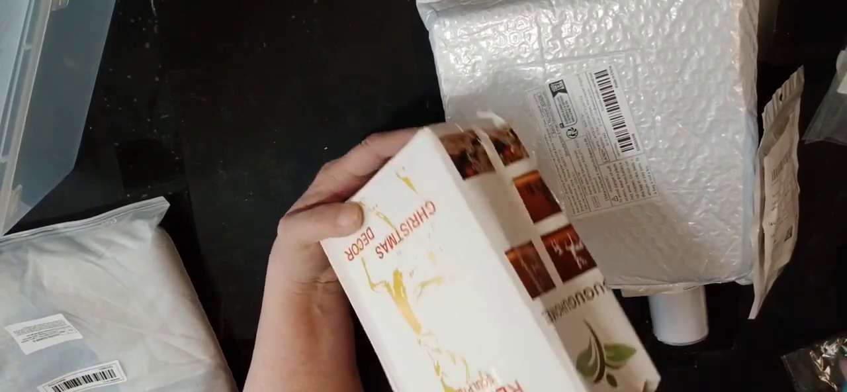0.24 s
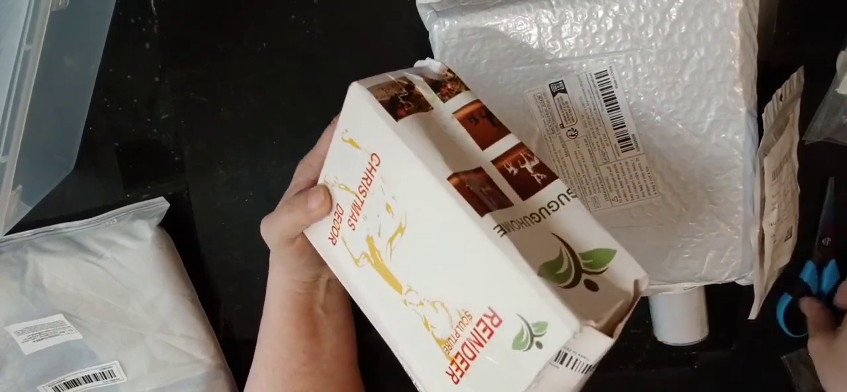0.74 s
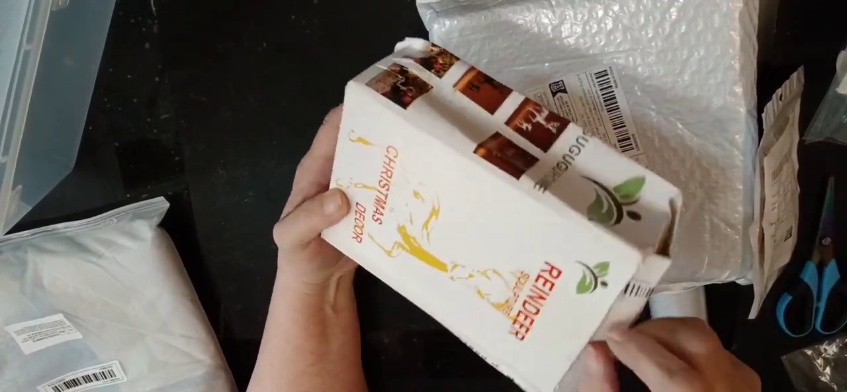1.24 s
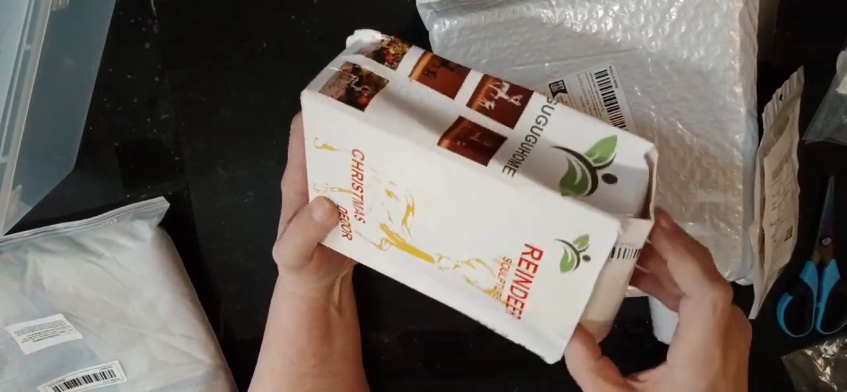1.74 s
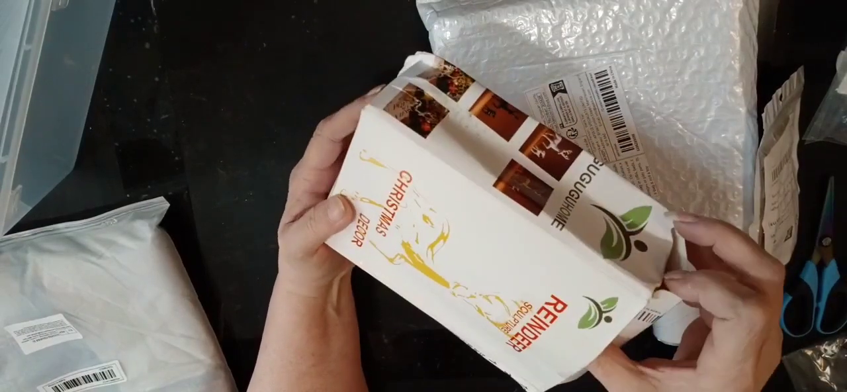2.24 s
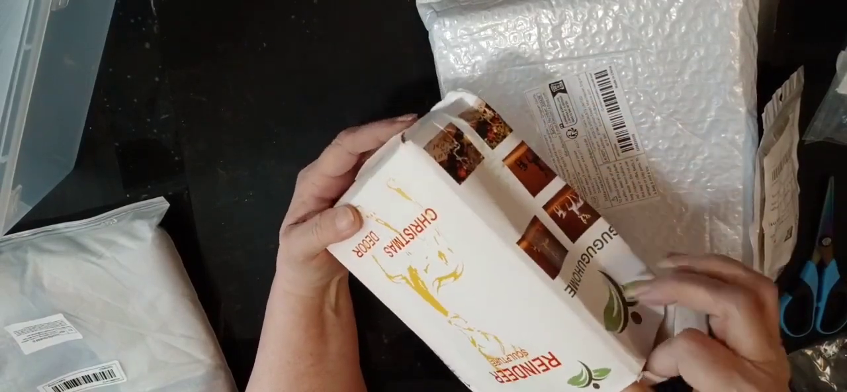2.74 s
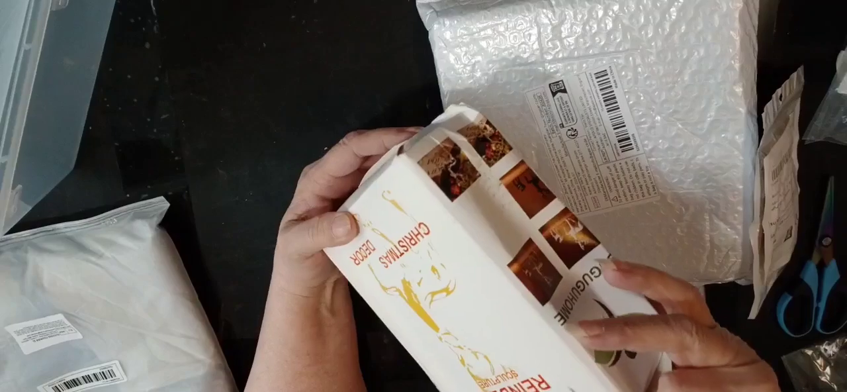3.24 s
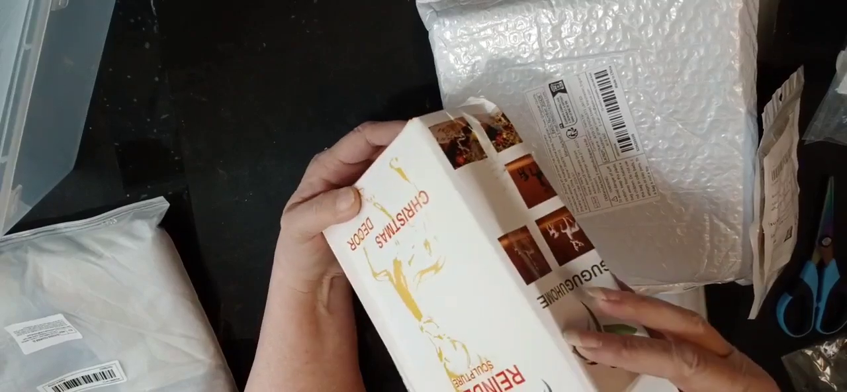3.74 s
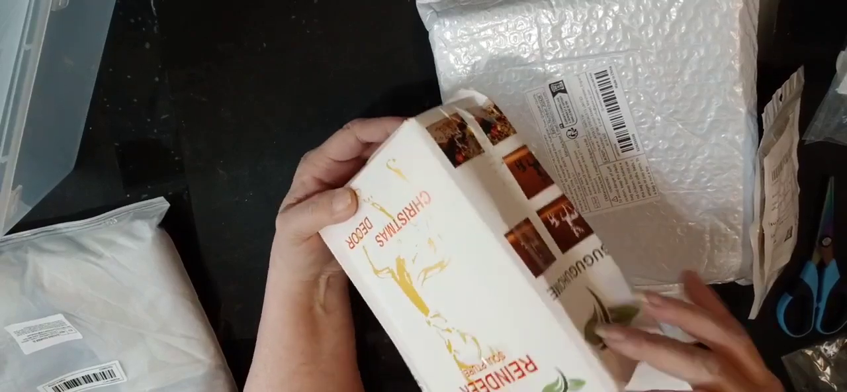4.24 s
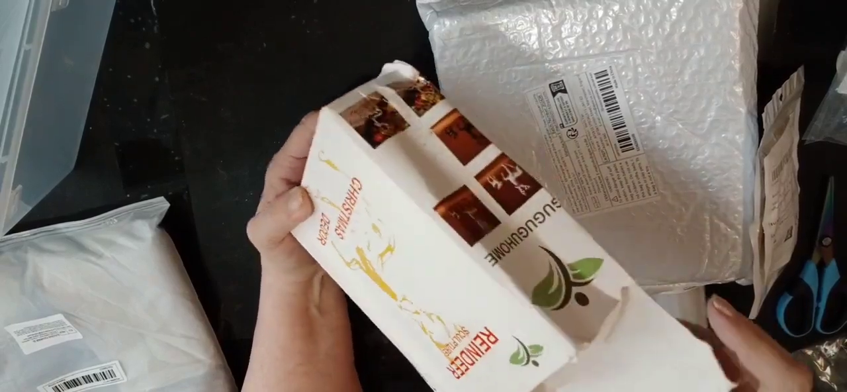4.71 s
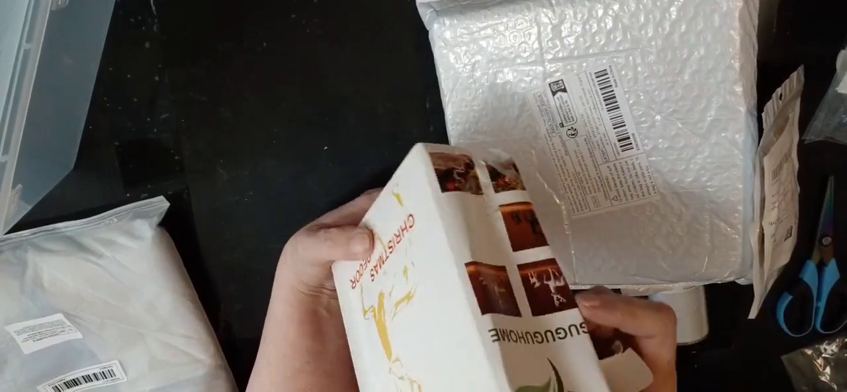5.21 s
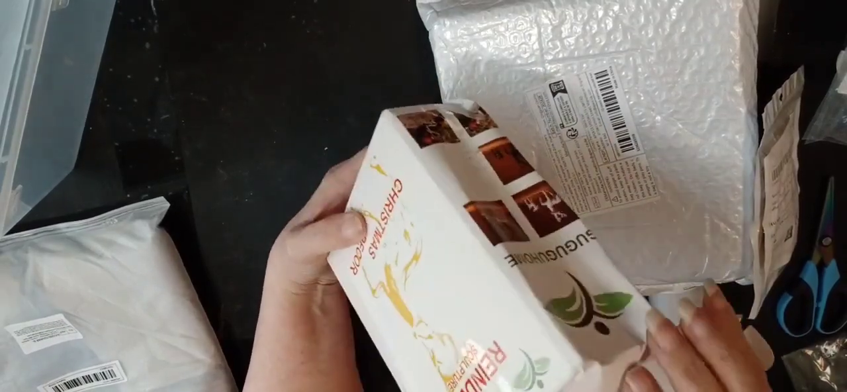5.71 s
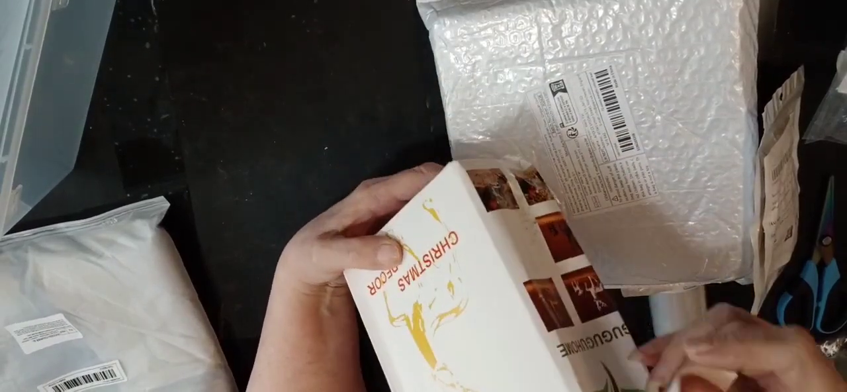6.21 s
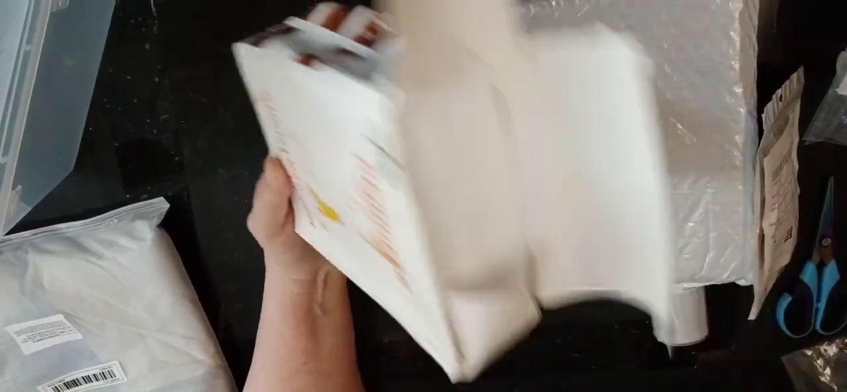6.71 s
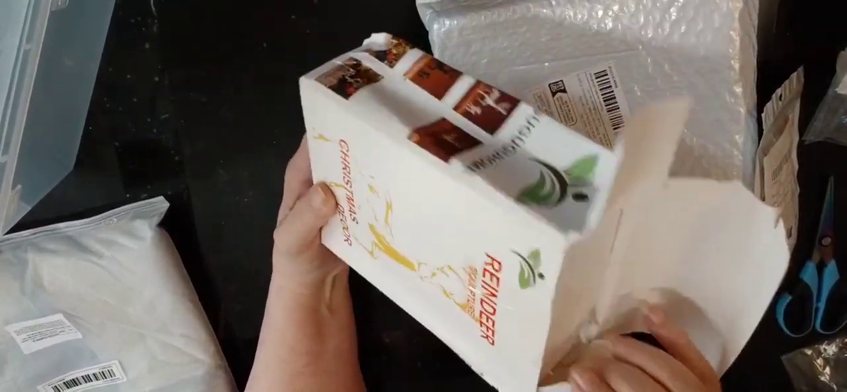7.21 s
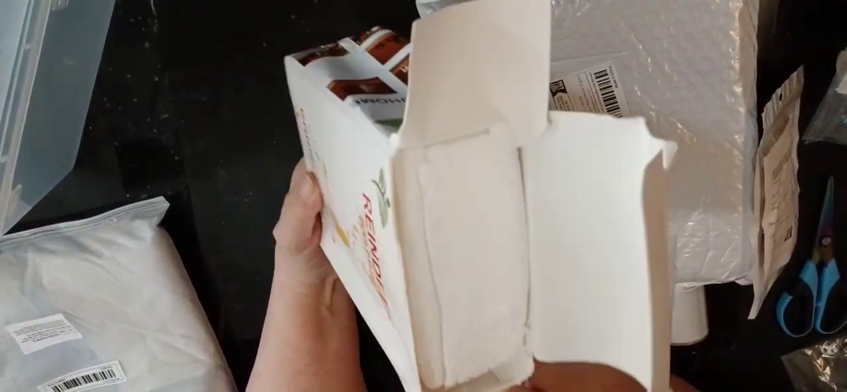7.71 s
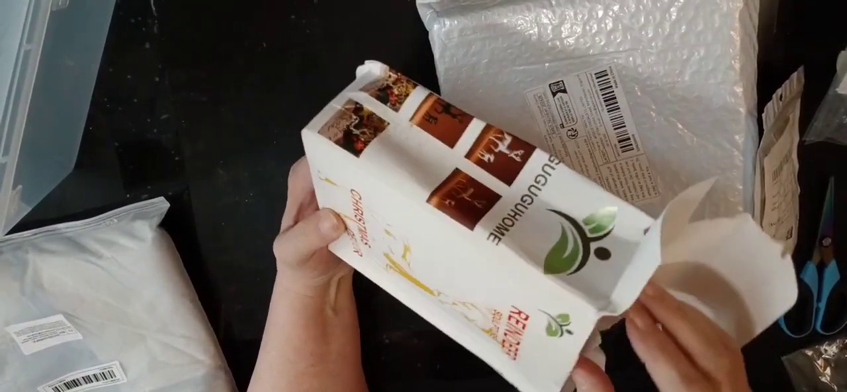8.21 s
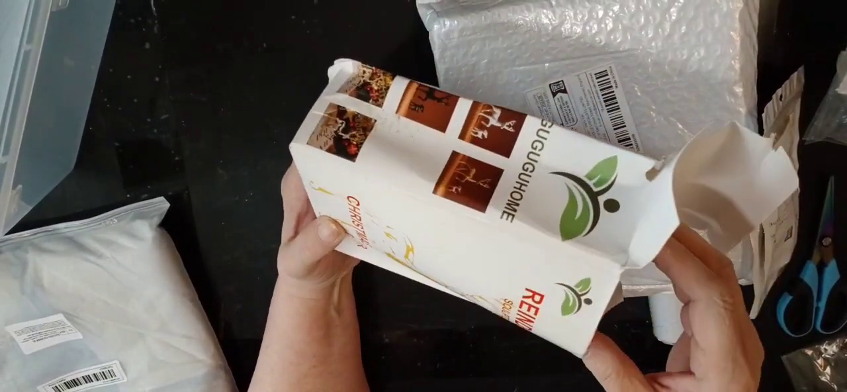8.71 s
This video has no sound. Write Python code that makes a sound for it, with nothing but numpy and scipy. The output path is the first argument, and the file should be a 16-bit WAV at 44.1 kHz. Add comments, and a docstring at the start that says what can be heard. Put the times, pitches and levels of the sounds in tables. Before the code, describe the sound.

A thin cardboard box is handled close up in a small, dry room with very faint low ventilation rumble. It starts almost silent; at 0.45-0.65 s the box bumps the table with soft low thuds and a thin bright tick. Sparse faint rubbing and small taps follow, with a crisp pop near 2.05. From 2.8 scraping grows, with hollow crackling thumps at 3.1-3.2 and the loudest sharp snap at 3.36, edged with a short rasping squeak. Lighter creaks and clicks come at 4.2, then a boxy buckling pop at 4.83. Busy sliding continues, with pops and a creak at 5.5-5.7. From 5.9 to 6.45 the flap drags out with a gritty rasp, ticks and snaps. A brief lull follows; soft brushing resumes at 7.1, a strong crack lands at 7.44, a click at 8.1, then light rubbing fades.

```python
"""Cardboard box worked open

A thin box is turned in the hands over a table in a small room: it bumps the table, then its end flap is freed.
Rubbing is random tiny slips over a smooth hiss; snaps are a crack plus crumbling noise; both ring through the box.
Gliding narrow-band noise rasps, swelling mode pairs creak, high-passed noise ticks, damped modes thud and thump.
The dragging flap tears free and snaps; short room reflections and a low ventilation rumble lie behind."""
import sys
import numpy as np
from scipy import signal
from scipy.fft import rfft, irfft
from scipy.io import wavfile
from scipy.ndimage import uniform_filter1d

SR = 44100
rng = np.random.default_rng(int(sys.argv[2]) if len(sys.argv) > 2 else 0)


def int16_out(signal):
    """Quantize to a 16-bit WAV file."""
    q = np.round(np.clip(np.atleast_2d(signal).T, -1, 1) * 32767)
    wavfile.write(sys.argv[1], SR, q.astype(np.int16))


N = 394694
TIME = np.arange(N) / SR
RING_SIZE = 2 ** 14
AGE = np.arange(RING_SIZE) / SR
HZ = np.maximum(np.fft.rfftfreq(RING_SIZE, 1 / SR), 1)

# body, flap and fibres, one row each: [left-right likeness/0-1, scattered re direct sound/dB]
SOUND_ZONES = [(.93, -8), (.87, -4), (.65, 0)]


def from_db(db):
    """Decibels to gain."""
    return 10 ** (np.asarray(db) / 20)


def unit(x):
    """Scale to a mean energy of one per channel."""
    channels = x.size / x.shape[-1]
    return x / np.sqrt(np.sum(x ** 2) / channels + 1e-20)


def blow(sound, db):
    """Give a short sound its level: its energy spread over 20 ms, as rms."""
    return from_db(db) * unit(sound) * np.sqrt(.02 * SR)


def add(out, start, sound):
    """Mix a sound in from a sample on."""
    out[:, start:start + sound.shape[-1]] += sound[:, :N - start]


def in_time(rows):
    """Columns of a curve at every sample."""
    s, *columns = np.transpose(rows)
    return [np.interp(TIME, s, column) for column in columns]


def drift(knots_per_s):
    """Smooth chance with a spread of about one."""
    knots = rng.standard_normal(N // 20)
    return np.interp(TIME * knots_per_s, np.arange(len(knots)), knots)


def spectrum_db(points):
    """Join spectrum points on a log-frequency axis."""
    hz, db = np.transpose(points)
    return np.interp(np.log(HZ), np.log(hz), db)


def causal(gain):
    """Minimum-phase impulse response with the given gain per frequency, by folding the cepstrum."""
    cepstrum = irfft(np.log(gain + 1e-7))
    cepstrum[1:RING_SIZE // 2] *= 2
    cepstrum[RING_SIZE // 2 + 1:] = 0
    return irfft(np.exp(rfft(cepstrum)))


def through(x, response):
    """Pass a sound through an impulse response."""
    return signal.fftconvolve(np.atleast_2d(x), np.atleast_2d(response), axes=-1)[:, :x.shape[-1]]


def pair(x, likeness):
    """Mix three unrelated signals into two partly alike channels."""
    share = np.clip(likeness, 0, 1)
    return np.sqrt(share) * x[0] + np.sqrt(1 - share) * x[1:]


def rubbing(responses, slips_per_s=3400, size_db=2.5, judder_db=1.91, smooth=.55):
    """Fibres catch and let go at random; harder strokes free more of them, over a smooth sliding hiss."""
    power = hand_power()
    total = power.sum(axis=0)
    level_db = 10 * np.log10(total)
    shares = np.sqrt(power / total)

    # slips_per_s holds at a level of -41.5 dB
    chance = slips_per_s / SR * from_db(0.27 * (level_db + 41.5))
    happens = rng.random(N) < chance
    sizes = happens * from_db(size_db * np.minimum(rng.exponential(1, N), 4))
    local_power = uniform_filter1d(sizes ** 2, size=1500).clip(0)
    slips = sizes / np.sqrt(local_power + .001)

    stroke = from_db(level_db + judder_db * drift(130)) / np.hypot(1, smooth)
    force = np.hypot(slips, smooth) * stroke * rng.standard_normal((3, N))
    out = np.zeros((2, N))
    for share, (likeness, scatter_db), response in zip(shares, SOUND_ZONES, responses):
        out += through(turning(share * pair(force, likeness), scatter_db), response)
    return out


def hand_power(lean=0.93, point=1):
    """Rubbing power in body, flap and fibres: holding hands, dragging flap and one arch per stroke."""
    # levels here are ahead of the rubbing gain in scene()
    # fingers and card edges sliding: [start t/s, length/s, flap/dB, body re flap/dB, fibre hiss re flap/dB]
    strokes = [(0.119, 0.16, -72.5, 0.5, -3), (0.519, 0.16, -56.5, -13, 0.5), (1.374, 0.13, -56, -2.5, 2),
               (1.608, 0.05, -55, -2, -3), (1.765, 0.2, -54.5, -3, 0.5), (1.951, 0.075, -47.5, -3, 0),
               (1.99, 0.23, -53, 2, -3), (2.303, 0.22, -53.5, -3.5, 0), (2.828, 0.055, -49.5, 0, -8),
               (2.87, 0.17, -48, -5.5, -5.5), (3.031, .21, -44, -11.5, -1), (3.3, 0.094, -36.5, -3, -3),
               (3.537, 0.044, -50.5, -12, -3), (3.868, 0.038, -50, -7, -8), (4.056, 0.13, -56, -7, -2),
               (4.193, 0.075, -47, -9, -4), (4.268, 0.03, -47.5, -1.5, -3), (4.442, 0.15, -52.5, -5.5, 0.5),
               (4.697, 0.069, -48, -0.5, -1), (4.713, 0.3, -52.5, -7.5, -1.5),
               (5.06, 0.18, -47.5, -5.5, -4), (5.12, 0.076, -46, 3, -6), (5.222, 0.17, -48.5, -12, -4),
               (5.298, 0.089, -43, -6, -4), (5.643, 0.095, -49.5, -5, -5), (5.741, 0.08, -45.5, -10, 0.5),
               (6.166, 0.082, -39, -10, 3), (6.272, 0.055, -40.5, -10.5, -12), (6.47, 0.073, -51, -6, -1),
               (6.556, 0.031, -49.5, -24.5, -6), (7.018, 0.1, -57, -7, -2), (7.099, 0.092, -50.5, -5.5, -1),
               (7.392, 0.1, -43, -10, 0.5), (7.464, 0.12, -42.5, -10, -4), (7.578, 0.064, -43, -5.5, -7),
               (7.708, 0.07, -53.5, -3.5, 2), (7.77, 0.043, -49.5, -7.5, 2), (7.838, 0.11, -49.5, -5.5, -2),
               (8.209, 0.11, -48, -3, -1.5), (8.341, 0.063, -47.5, -5, 1.5),
               (8.483, 0.1, -51.5, -8.5, -2.5), (8.6, 0.19, -60, -6.5, 3)]
    # light friction of the hands that hold the box: [t/s, flap/dB]
    hold = [(0, -80), (.95, -79), (1.4, -60.5), (1.8, -64.5), (2.2, -61.5), (2.7, -61.5), (3.0, -56),
            (3.27, -67.5), (4.42, -65.5), (4.95, -63), (5.52, -66.5), (5.8, -54), (6.65, -71),
            (6.98, -82.5), (7.15, -60), (8.06, -66), (8.17, -54.5), (8.94, -64.5)]
    # tucked flap dragging out of its slot: [t/s, flap/dB, body re flap/dB, fibre hiss re flap/dB]
    drag = [(5.86, -60.5, -12, -11), (5.895, -42, -22, 1.5), (6.01, -43, -5.5, 1), (6.15, -48.5, -6, 1),
            (6.27, -47, -5.5, -4), (6.42, -39.5, -12.5, 0), (6.47, -81, 22.5, -36)]
    hold_body_db, hold_fibre_db = -4.5, -2.5  # re flap

    def zone_power(flap_db, body_db, fibre_db):
        return from_db([flap_db + body_db, flap_db, flap_db + fibre_db]).reshape(3, -1) ** 2

    dragging = (TIME > drag[0][0]) & (TIME < drag[-1][0])
    flap_db, = in_time(hold)
    holding = zone_power(flap_db, hold_body_db, hold_fibre_db)
    power = holding + dragging * zone_power(*in_time(drag))
    for s, length_s, *levels_db in strokes:
        progress = np.linspace(0, 1, round(length_s * SR))
        arch = np.abs(np.sin(np.pi * progress ** lean)) ** point  # lean shifts the crest
        add(power, round(s * SR), zone_power(*levels_db) * arch ** 2)
    return power


def snapping(responses, crack=1.1, ragged_db=4.5):
    """Each snap is one sharp crack and a quickly dying crumble of smaller breaks."""
    # creases popping, fibres tearing, nails tapping; levels ahead of flexing:
    # [t/s, flap/dB, body re flap/dB, fibre hiss re flap/dB, crumble energy decay/ms]
    snaps = [(1.018, -67, 2.5, -0.5, 4.4), (1.123, -55, 1.5, -0.5, 8.3), (1.583, -54.5, -5.5, -2, 0.89),
             (2.0506, -41, 1, -5, 6.2), (2.265, -50.5, 1, -5, 11), (2.443, -46, 1.5, -0.5, 5.3),
             (2.81, -55, -1, -6, 0.69), (3.113, -38.5, -4, -2.5, 11), (3.147, -40.5, -5, 2, 6.8),
             (3.17, -37.5, 4.5, -4, 3.6), (3.3572, -23, -5.5, -6.5, 4.4), (4.218, -42, -7, -2.5, 4.7),
             (4.239, -44, -5.5, -16, 2.3), (4.683, -53, -7, -3.5, 2.4), (4.8313, -29, 2, -4.5, 3.4),
             (5.528, -43, -2, -3, 8.8), (5.556, -39.5, -7.5, -4.5, 4.1), (5.689, -40.5, -1.5, 0, 3.5),
             (5.912, -51.5, -1, 12.5, 1.9), (5.954, -59.5, -10.5, 21, 1.9), (6.093, -36.5, -13.5, -8, 2),
             (6.333, -34, -9.5, 1, 4.9), (6.402, -38, -15.5, -1.5, 4), (7.428, -35, -8.5, 1.5, 5.3),
             (7.442, -25.5, -7, -3.5, 8.3), (8.116, -37.5, -9, -3, 0.56), (8.216, -54, 1, -13, 1),
             (8.318, -47, 0, -2, 8)]
    out = np.zeros((2, N))
    for s, flap_db, body_db, fibre_db, crumble_ms in snaps:
        raggedness = from_db(ragged_db * rng.standard_normal(RING_SIZE))
        breaks = rng.standard_normal((3, RING_SIZE)) * raggedness
        crumble = unit(breaks * np.exp(-AGE * 1000 / (2 * crumble_ms)))
        for share_db, (likeness, scatter_db), response in zip((body_db, 0, fibre_db), SOUND_ZONES, responses):
            force = pair(crumble, likeness) + crack / crumble_ms * (AGE == 0)
            ring = through(through(force, scatter(scatter_db)), response)
            add(out, round(s * SR), blow(ring, flap_db + share_db))
    return out


def box_responses(body_top_hz=1085, flap_top_hz=5040):
    """The hollow body carries the lows, the flaps the middle, the surface fibres the top."""
    # resonances of box and flaps: [f/Hz, width/Hz, height/dB]
    resonances = [(363, 60, 4.5), (471, 210, 5.5), (769, 110, 3), (1477, 220, 6)]
    # sound of one slip on card: [f/Hz, relative density/dB per Hz]
    card_spectrum = [(40, -44.5), (110, -8), (240, -13.5), (380, -6.5), (780, 0), (1100, -2.5),
                     (2400, -0.5), (4500, -1), (8000, -6.5), (16000, -16)]
    colour_db = spectrum_db(card_spectrum)
    for hz, width_hz, height_db in resonances:
        colour_db = colour_db + height_db / (1 + (2 * (HZ - hz) / width_hz) ** 2)
    below_body, below_flap = [1 / (1 + (HZ / hz) ** 6) for hz in (body_top_hz, flap_top_hz)]
    shares = [below_body, (1 - below_body) * below_flap, 1 - below_flap]
    return [unit(causal(from_db(colour_db) * np.sqrt(share))) for share in shares]


def flexing(x, width_hz=150):
    """The card's main resonance moves and changes height as the hands bend the flap and open the box."""
    # main resonance of the flap as it is bent: [t/s, f/Hz, height/dB]
    flex = [(1.45, 1170, 10), (2.1, 620, -1), (2.45, 950, 9), (2.9, 890, 8.5), (4.2, 1320, 2),
            (5.3, 1420, 6.5), (5.85, 1460, 4), (6.15, 2300, 2.5), (7.5, 1900, -2), (8.2, 1400, 7),
            (8.7, 1080, 12)]
    hz, height_db = in_time(flex)
    turn = np.exp(2j * np.pi * np.cumsum(hz) / SR)
    pole = np.exp(-np.pi * width_hz / SR)
    # shift the resonance to 0 Hz, low-pass, shift back
    ring = 2 * np.real(turn * signal.lfilter([1 - pole], [1, -pole], x / turn))
    return x + (from_db(height_db) - 1) * ring


def squeaking(width_hz=260):
    """A rough edge drives one flap resonance, whose pitch glides as the free length changes."""
    # a card edge rasping along card: [t/s, length/s, first f/Hz, last f/Hz, level/dB]
    squeaks = [(3.319, 0.038, 1750, 1378, -25), (3.32, 0.039, 2314, 2454, -26.5),
               (6.203, 0.041, 2630, 2184, -38.5), (6.273, 0.0376, 2490, 1734, -43.5),
               (6.392, 0.026, 2370, 2100, -35.5), (7.278, 0.036, 2910, 2890, -53),
               (7.507, 0.035, 2104, 2160, -42)]
    out = np.zeros((2, N))
    narrow = signal.butter(2, width_hz, fs=SR, output="sos")
    for s, length_s, first_hz, last_hz, db in squeaks:
        progress = np.minimum(AGE / length_s, 1)
        phase = 2 * np.pi * np.cumsum(first_hz + (last_hz - first_hz) * progress) / SR
        grip = signal.sosfilt(narrow, rng.standard_normal((2, RING_SIZE)))
        rasp = np.sin(np.pi * progress) * (grip[0] * np.sin(phase) + grip[1] * np.cos(phase))
        add(out, round(s * SR), blow(through(rasp, scatter(db=0.5)), db))
    return out


def creaking(wander=0.041):
    """A flap sticks and slips on its neighbour: two modes swell and die away, unsteady in pitch."""
    # [t/s, swell time to crest/s, low mode f/Hz, level/dB, high mode f/Hz, level/dB]
    creaks = [(4.21, 0.0096, 1310, -43.5, 3140, -41.5), (5.687, 0.0032, 1470, -38, 2776, -32.5)]
    out = np.zeros((2, N))
    for s, swell_s, low_hz, low_db, high_hz, high_db in creaks:
        swell = (AGE / swell_s) ** 2 * np.exp(-2 * AGE / swell_s)
        for hz, db in ((low_hz, low_db), (high_hz, high_db)):
            unsteady_hz = hz * (1 + wander * drift(510)[:RING_SIZE])
            phase = 2 * np.pi * np.cumsum(unsteady_hz) / SR
            add(out, round(s * SR), blow(through(swell * np.sin(phase), scatter(db=-5)), db))
    return out


def ticking(edge_hz=5800):
    """Each tick is a spit of decaying treble noise with almost no body."""
    # thin, very bright ticks, perhaps of crinkling plastic, and of tearing fibres:
    # [t/s, level/dB, amplitude decay/ms]
    ticks = [(.559, -38.5, 4.4), (1.285, -44, 7.3), (1.358, -56, 3), (5.049, -41, 9.6), (5.9, -48, 3),
             (6.008, -36, 3), (6.046, -50, 3), (6.113, -42, 4), (6.137, -45, 3.5)]
    out = np.zeros((2, N))
    thin = signal.butter(2, edge_hz, "high", fs=SR, output="sos")
    for s, db, decay_ms in ticks:
        spit = pair(rng.standard_normal((3, RING_SIZE)), likeness=.5) * np.exp(-AGE * 1000 / decay_ms)
        add(out, round(s * SR), blow(signal.sosfilt(thin, spit), db))
    return out


def thudding():
    """Soft low thuds: the box bumps the table, and later gives one faint low thud of its own."""
    # [t/s, level/dB, softness as cut-off f/Hz]
    thuds = [(0.447, -45, 188), (0.5884, -33.5, 826), (0.61, -34, 215), (0.6385, -30.5, 630),
             (5.533, -54, 138)]
    # thud modes: [f/Hz, level/dB, t60/s]
    thud_modes = [(113, -5.5, 0.19), (162, -6.5, 0.11), (209, -3.5, 0.03), (347, 2.5, 0.057),
                  (419, -2.5, 0.043), (498, 1, 0.038), (706, 2, 0.04), (1620, -1, 0.02)]
    out = np.zeros((2, N))
    for s, db, soft_hz in thuds:
        ring = softened(struck(thud_modes), soft_hz)
        add(out, round(s * SR), blow(through(ring, scatter(db=-0.5)), db))
    return out


def buckling(puff_hz=148, puff_t60_s=.055, panel_t60_s=.068, panel_low_hz=308):
    """A buckling panel thumps and pushes a puff of air out of the box."""
    # [t/s, level/dB, softness as cut-off f/Hz, air puff re level/dB]
    thumps = [(3.11, -35, 410, -20.5), (3.131, -40, 405, -23.5), (3.145, -39.5, 460, -14),
              (3.168, -35.5, 510, -7), (3.357, -25.5, 760, -14.5), (4.8298, -27.5, 604, -7)]
    # panel modes: [f/Hz, level/dB]
    panel_modes = [(346, 0), (393, -3), (468, 4.5), (538, 2), (722, 2), (845, -4)]
    out = np.zeros((2, N))
    # a small panel radiates little bass
    radiated = signal.butter(2, panel_low_hz, "high", fs=SR, output="sos")
    for s, db, soft_hz, puff_db in thumps:
        ring = softened(struck([(hz, mode_db, panel_t60_s) for hz, mode_db in panel_modes]), soft_hz)
        ring = signal.sosfilt(radiated, ring)
        puff = softened(struck([(puff_hz, 0, puff_t60_s)]), puff_hz)
        add(out, round(s * SR), blow(through(ring, scatter(db=-8)), db) + blow(puff, db + puff_db))
    return out


def struck(modes):
    """Damped modes, each hit a little differently."""
    ring = np.zeros(RING_SIZE)
    for hz, db, t60_s in modes:
        decay = from_db(db + rng.normal(0, 1.5) - 60 * AGE / t60_s)
        ring += decay * np.cos(2 * np.pi * hz * AGE)
    return ring


def softened(ring, soft_hz):
    """A soft contact leaves out the high modes."""
    return signal.sosfilt(signal.butter(4, soft_hz, fs=SR, output="sos"), ring)


def turning(x, scatter_db, size=3072):
    """As the box moves, each moment of rubbing fades over into a new pattern of reflections."""
    out, fade = np.zeros((2, N)), signal.get_window("hann", size)
    for start in range(0, N - size // 2, size // 2):
        piece = x[:, start:start + size]
        faded = piece * fade[:piece.shape[1]]
        add(out, start, signal.fftconvolve(faded, scatter(scatter_db), axes=-1))
    return out


def scatter(db, size=2048):
    """Direct sound plus quick reflections from flaps, hands and table, new for every pose of the box."""
    return unit((AGE[:size] == 0) + from_db(db) * tail(t60_s=0.021, delay_s=0.00076, size=size))


def tail(t60_s, delay_s, apart_hz=450, size=RING_SIZE):
    """Dense stereo reflections build up and die away; long waves reach both microphone ports alike."""
    age = AGE[:size]
    envelope = from_db(-60 * age / t60_s) * (1 - np.exp(-(age / delay_s) ** 2))
    mid, side = rng.standard_normal((2, size)) * envelope
    pole = np.exp(-2 * np.pi * apart_hz / SR)
    side = signal.lfilter([pole, -pole], [1, -pole], side)
    return unit(np.array([mid + side, mid - side]))


def room_tone(level_db=-65.5):
    """A low ventilation rumble with faint hiss, as shaped noise."""
    # still room: [f/Hz, relative density/dB per Hz]
    room_spectrum = [(25, -36.5), (50, -8.5), (78, 2.5), (98, -9.5), (125, -10), (250, -18.5), (800, -28),
                     (2000, -24.5), (6000, -44), (11000, -27.5), (16000, -21.5)]
    air = pair(rng.standard_normal((3, N)), likeness=0.2)
    return from_db(level_db) * through(air, unit(causal(from_db(spectrum_db(room_spectrum)))))


def scene(rub_db=1.5, room_db=-10, pan_db=1.0):
    """The box is held a little right of centre, close to the microphone in a fairly dead room."""
    responses = box_responses()
    card = flexing(from_db(rub_db) * rubbing(responses) + snapping(responses))
    box = card + squeaking() + creaking() + ticking() + thudding() + buckling()
    room = from_db(room_db) * through(box, tail(t60_s=0.19, delay_s=0.0034))
    return (box + room) * from_db([[-pan_db], [pan_db]]) + room_tone()


def record(dry, bass_hz=45, cutoff_hz=15850):
    """The left port lies one sample farther off; the small microphone loses deep bass; the top is cut steeply."""
    ports = np.array([np.append(0, dry[0, :-1]), dry[1]])
    thinned = signal.sosfilt(signal.butter(2, bass_hz, "high", fs=SR, output="sos"), ports)
    return signal.sosfilt(signal.ellip(10, .1, 70, cutoff_hz, fs=SR, output="sos"), thinned)


dry = scene()
out = record(dry)
int16_out(out)
```